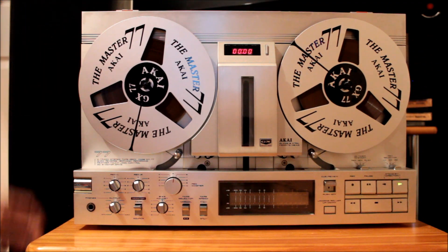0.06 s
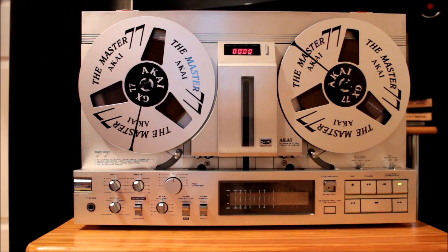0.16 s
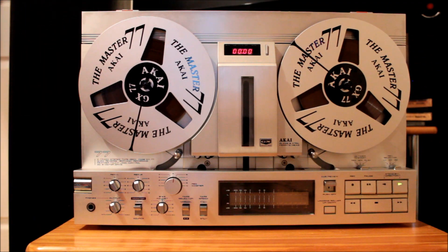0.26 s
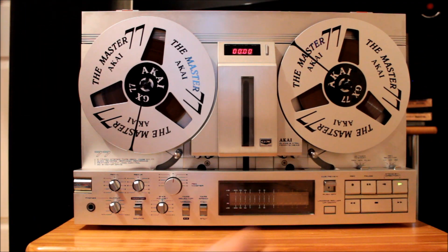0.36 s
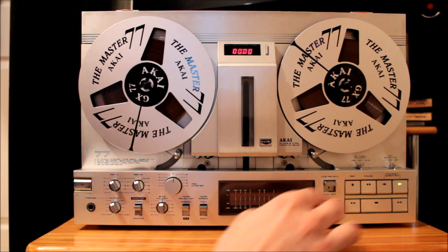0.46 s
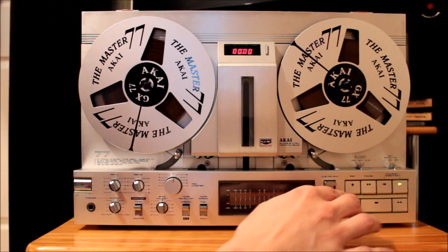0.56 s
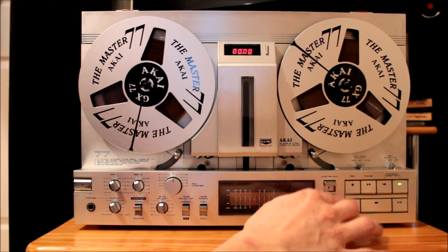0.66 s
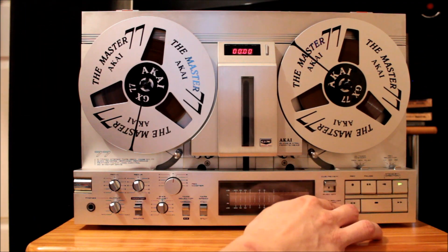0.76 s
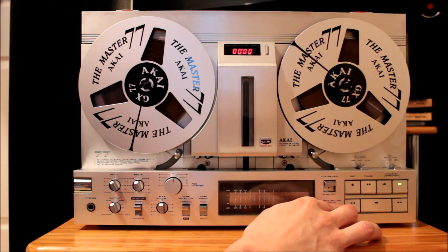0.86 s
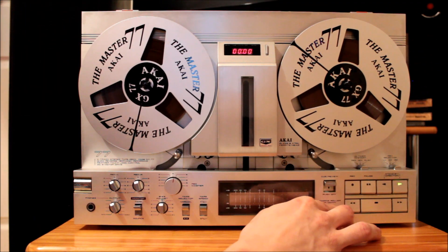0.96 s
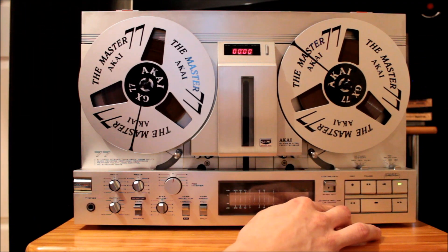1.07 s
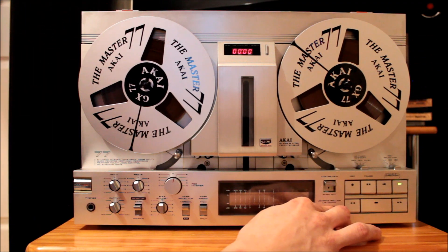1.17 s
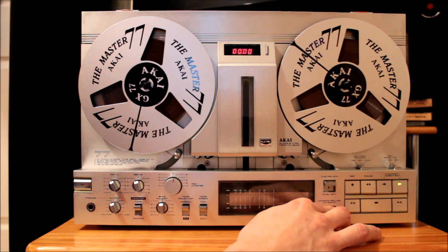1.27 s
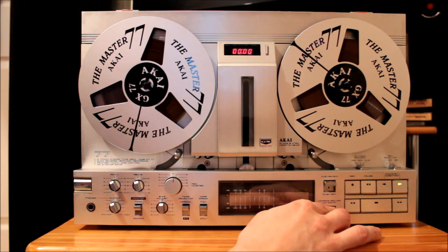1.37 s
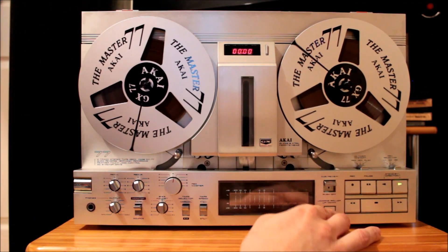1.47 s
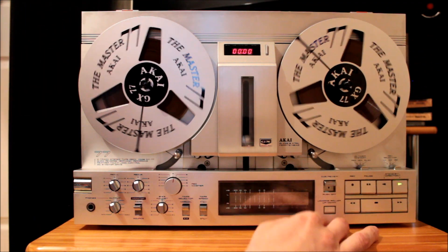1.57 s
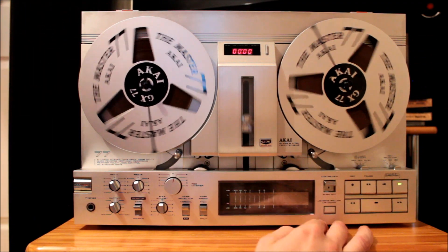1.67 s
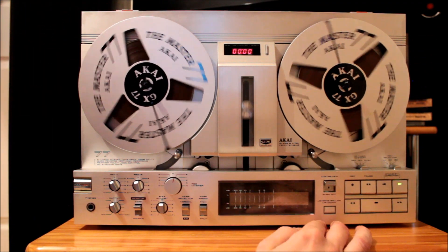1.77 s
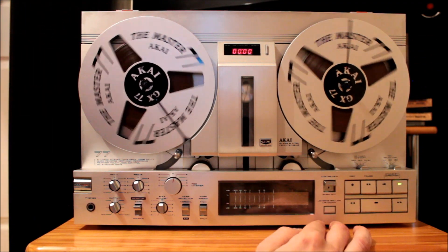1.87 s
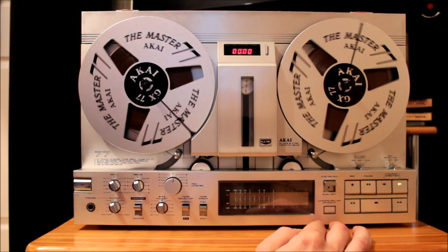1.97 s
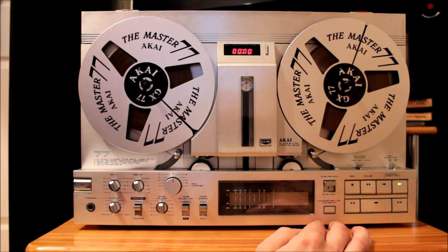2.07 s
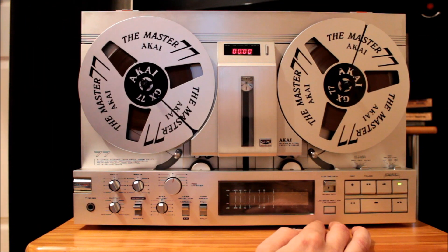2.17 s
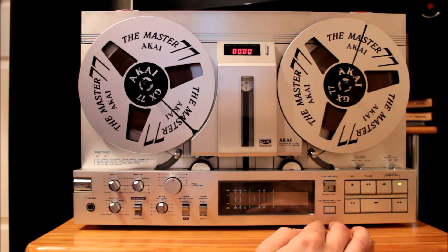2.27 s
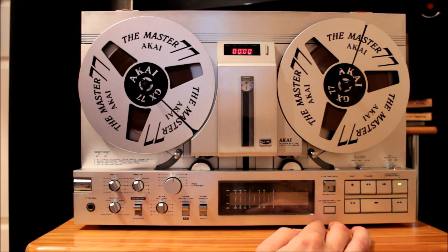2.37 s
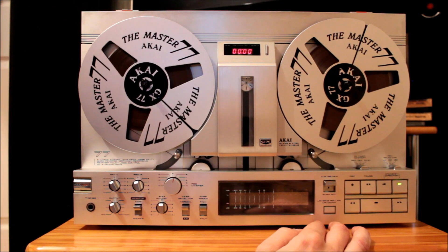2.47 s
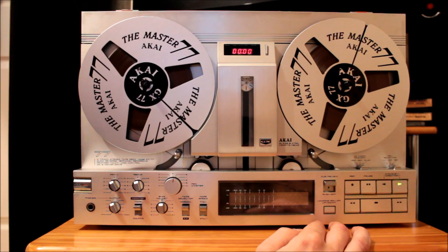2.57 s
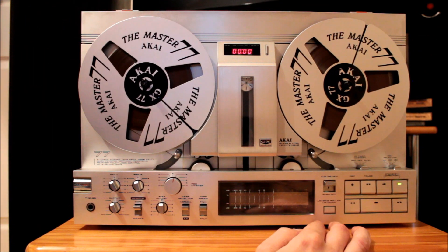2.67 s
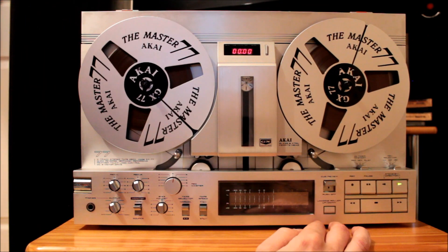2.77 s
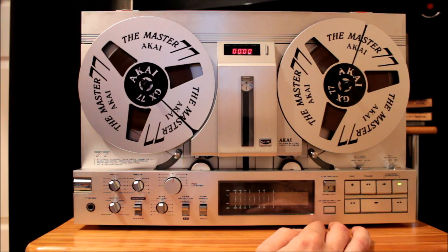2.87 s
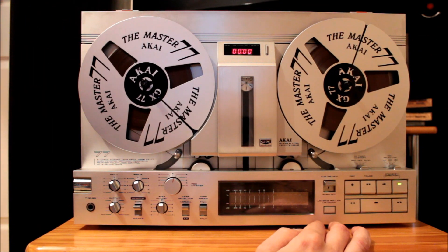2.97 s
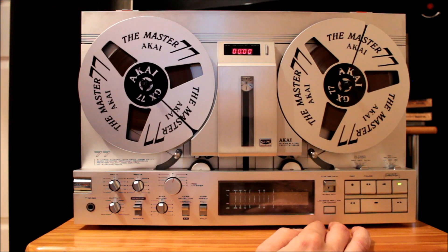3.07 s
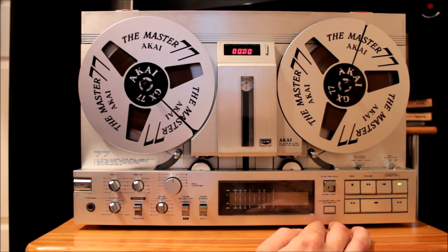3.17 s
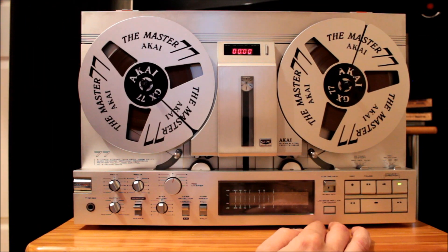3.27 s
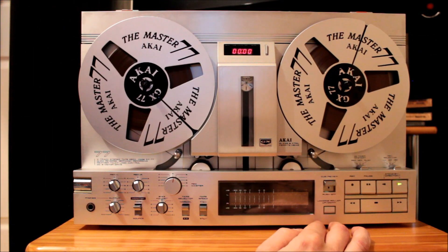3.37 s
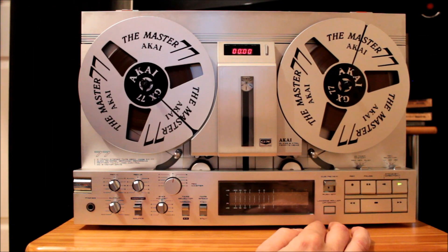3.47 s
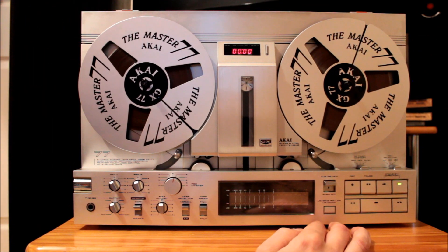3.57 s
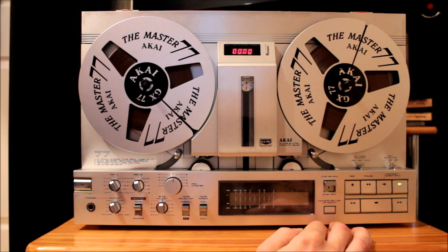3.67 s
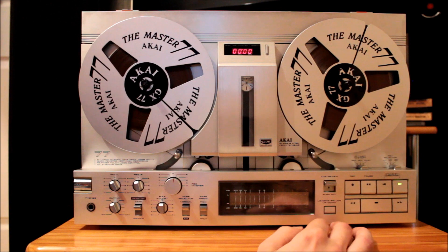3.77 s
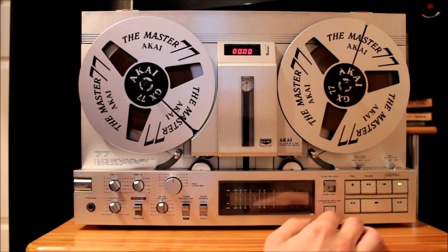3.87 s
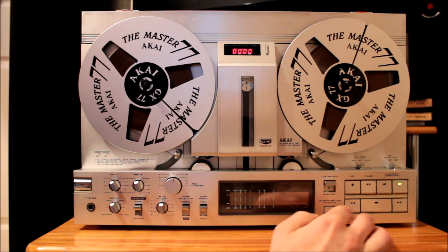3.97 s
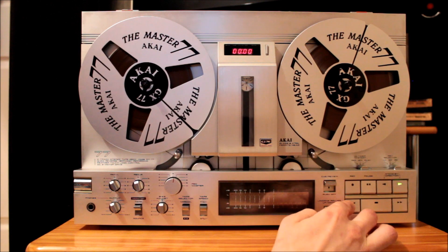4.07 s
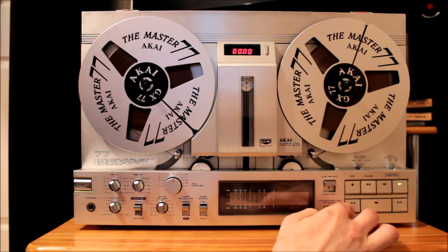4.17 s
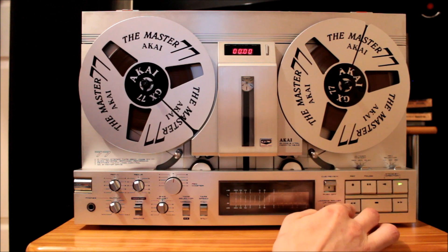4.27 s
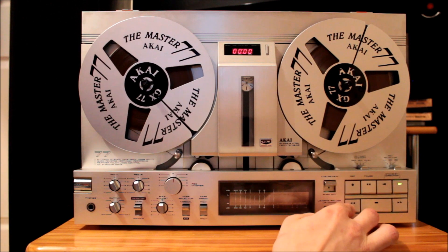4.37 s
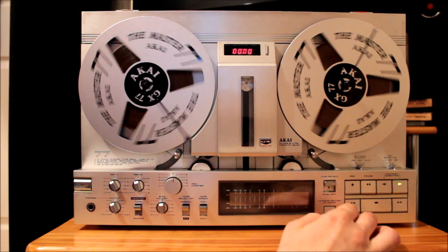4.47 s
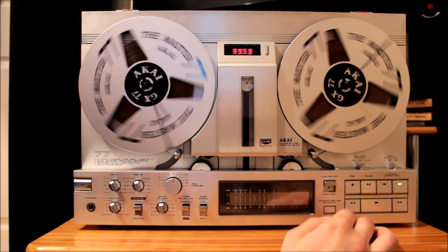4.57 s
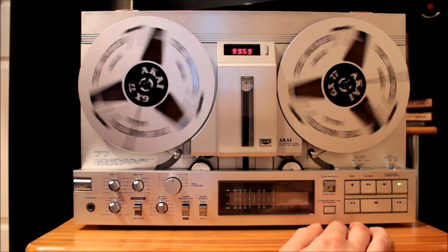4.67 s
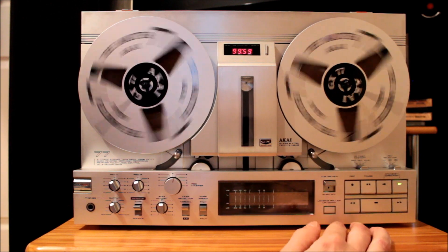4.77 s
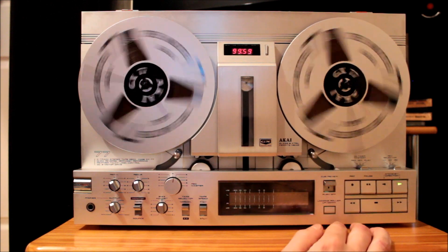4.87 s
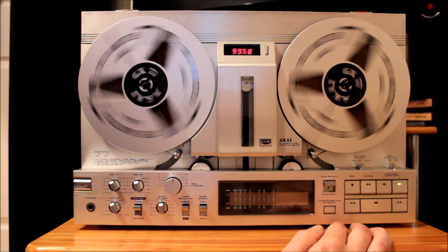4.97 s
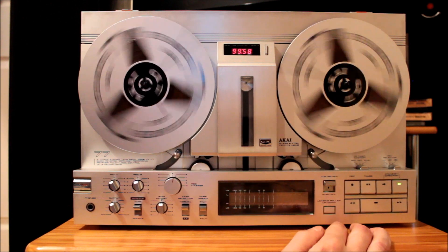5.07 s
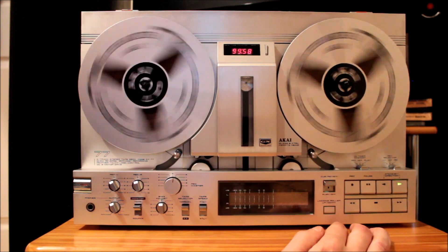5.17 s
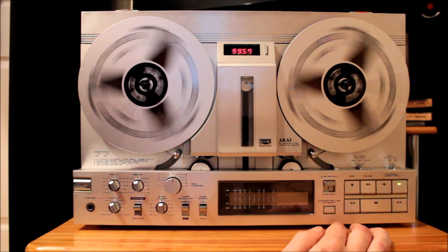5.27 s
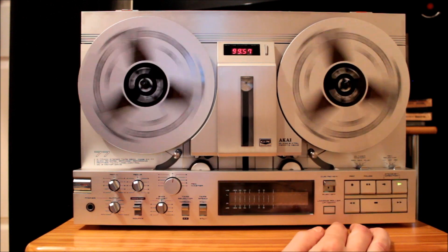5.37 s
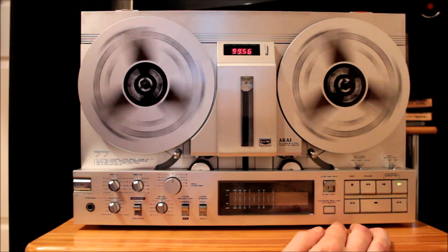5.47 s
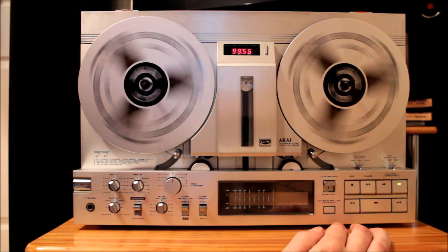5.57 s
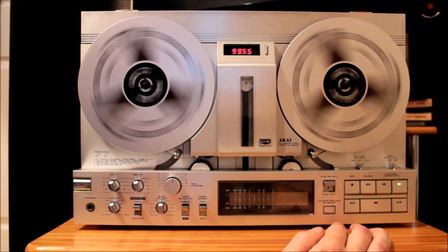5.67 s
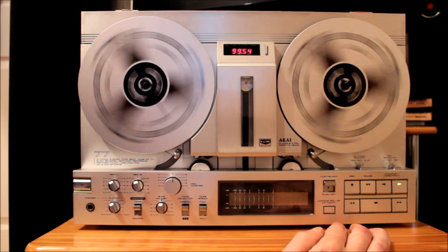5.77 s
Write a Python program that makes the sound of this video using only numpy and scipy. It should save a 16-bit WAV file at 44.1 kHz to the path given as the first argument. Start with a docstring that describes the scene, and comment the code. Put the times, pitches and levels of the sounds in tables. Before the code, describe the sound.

In a small quiet room, close to the microphone, cloth rustles softly. A reel-to-reel deck then clacks through a quick cluster of metallic clunks over a short rough motor hum, with smaller clicks as the motor stops. About two seconds of near silence follow. Light key clicks lead to one loud clunk, the case thumps, and the reels spin up with a motor whirr and swelling, singing tape hiss.

```python
"""Reel-to-reel tape deck in a quiet room: keys, levers and solenoids clunk as rattles of tiny impacts
that ring the deck's parts, the case rocks on its feet, and a small room echoes the clunks.
A sleeve (swelling cloth noise) rustles first; a lift motor (resonant noise plus harmonics) runs briefly.
Then the reels wind up to speed: tape hiss, singing guides and motor whirr, all noise growing with speed.
Steady air noise and low room tones lie beneath."""
import sys
import numpy as np
from scipy import signal
from scipy.fft import rfft, irfft
from scipy.io import wavfile

SR = 44100
rng = np.random.default_rng(int(sys.argv[2]) if len(sys.argv) > 2 else 0)


def invert_db(level):
    """Linear amplitude ratio for a level in decibels (20 dB per decade), elementwise."""
    return 10 ** (np.asarray(level, dtype=float) / 20)


def unload_audio(sound):
    """Save the sound as a 16-bit wav file, at the path given as the first command line argument."""
    columns = np.transpose(np.atleast_2d(sound))
    # keep every value between -1 and 1, then stretch to whole-number steps
    steps = np.round(np.clip(columns, -1, 1) * 32767)
    wavfile.write(sys.argv[1], SR, steps.astype(np.int16))


N = 256662


def rms_one(x):
    """Scale to unit rms."""
    return x / np.sqrt(np.mean(x ** 2) + 1e-20)


def coloured(points, size=N):
    """Unit-rms noise shaped by a relative spectrum in dB per Hz, interpolated over log frequency."""
    hz = np.maximum(np.arange(size // 2 + 1) * SR / size, 1)
    at_hz, db = np.transpose(points)
    shape = invert_db(np.interp(np.log(hz), np.log(at_hz), db, left=-80, right=-80))
    return rms_one(irfft(rfft(rng.standard_normal(size)) * shape, size))


def breathy(peaks):
    """Sum of noises through two-pole resonances; a 0 dB peak has unit rms."""
    out = 0
    for hz, width_hz, db in peaks:
        radius = np.exp(-np.pi * max(width_hz, 5) / SR)
        poles = [1, -2 * radius * np.cos(2 * np.pi * hz / SR), radius * radius]
        resonance = signal.lfilter([1, 0, -1], poles, rng.standard_normal(N))
        out = out + invert_db(db) * rms_one(resonance)
    return out


def drift(knots_per_s):
    """Slow random wander: unit-spread knots joined by straight lines."""
    knots = rng.standard_normal(400)
    return np.interp(np.arange(N) * knots_per_s / SR, np.arange(len(knots)), knots)


def ring(x, hz, t60_s):
    """Two-pole resonator: a unit click starts a decaying sine of height 1."""
    radius, w = invert_db(-60 / (t60_s * SR)), 2 * np.pi * hz / SR
    return signal.lfilter([0, np.sin(w)], [1, -2 * radius * np.cos(w), radius * radius], x + 1e-18)


def band(x, low_hz, high_hz, order=2):
    """Butterworth band-pass."""
    sos = signal.butter(order, [low_hz, min(high_hz, .45 * SR)], "band", fs=SR, output="sos")
    return signal.sosfilt(sos, x)


# air noise spectrum: (frequency [Hz], relative density [dB per Hz])
AIR_SPECTRUM = [(22, -20), (55, -18), (85, -10.5), (135, -6.5), (155, -12.5), (190, -1), (235, -1.5),
                (366, -7.5), (988, -11), (1300, -16.5), (2450, -23.5), (8030, -28.5), (13200, -23.5),
                (16000, -28)]
# low room tones: (frequency [Hz], width [Hz], level [dB])
ROOM_TONES = [(92.9, 1.7, -63.5), (135.4, 15, -66.5), (214, 14, -66)]
AIR_LEVEL_DB = -49.5


def room_air():
    """Steady broadband air noise plus narrow low resonances of the room."""
    return invert_db(AIR_LEVEL_DB) * coloured(AIR_SPECTRUM) + breathy(ROOM_TONES)


# sleeve strokes: (start [s], length [s], peak level [dB])
SLEEVE_STROKES = [(0.027, 0.18, -59.5), (.12, 0.28, -52), (0.37, 0.18, -56.5), (0.505, 0.19, -55.5),
                  (.8, .15, -63), (1.094, .03, -58), (1.12, 0.033, -57)]
# cloth friction spectrum: (frequency [Hz], relative density [dB per Hz])
CLOTH_SPECTRUM = [(900, -1), (2000, -2), (5000, -4), (9000, -9.5), (16000, -8.5)]


def sleeve():
    """Cloth brushes on cloth as the arm reaches over: noise swelling and fading in half-sine strokes."""
    t = np.arange(N) / SR
    level = 0
    for start_s, length_s, db in SLEEVE_STROKES:
        level = level + invert_db(db) * np.sin(np.pi * np.clip((t - start_s) / length_s, 0, 1))
    flutter = invert_db(0.89 * drift(58.6))
    return level * flutter * coloured(CLOTH_SPECTRUM)


# keys, levers, solenoids: (time [s], nominal knock level [dB], nominal crack level re knock [dB],
#   struck-part pitch [Hz], rattle decay [ms])
CONTACT_EVENTS = [(1.246, -21.5, -10.5, 2000, 3.2), (1.266, -13.5, -3, 2400, 5.4),
                  (1.270, -14.5, -3, 3300, 3.96), (1.275, -5, -5, 1510, 2.48), (1.290, -31, -7, 4640, 14),
                  (1.322, -10, -26, 1460, 2.36), (1.325, -15, -14, 2320, 7.3),
                  (1.357, -17, -1.5, 2030, 3.5), (1.440, -29.5, -32, 1150, 6), (1.481, -24, -4, 1910, 2.7),
                  (1.484, -8, 1, 2380, 4.05), (1.491, -13, -2.5, 2560, 5.05),
                  (1.563, -17.5, -31, 1500, 2.7), (1.565, -16, -15, 2650, 4.1),
                  (1.589, -17, 2.1, 2420, 9.7), (1.596, -18, 7, 4020, 2.9), (1.604, -13, 0.5, 2400, 6.7),
                  (1.678, -30, -30, 2710, 7.66), (2.027, -19.5, -28, 2120, 3.6),
                  (2.029, -20, -35, 1300, 3.7), (2.031, -33.5, -35, 680, 4.7), (2.093, -16.5, 1, 2320, 4.6),
                  (2.108, -22, -1.5, 1920, 13), (2.128, -22, -7, 4540, 2.4), (2.130, -16, -2.5, 1670, 5.6),
                  (2.138, -25.5, -17, 528, 11.8), (2.248, -33, -21, 13100, 1.9),
                  (4.283, -38.5, -25, 2400, 3.5), (4.354, -32.5, -14, 1600, 6.6),
                  (4.38, -39, -12, 3330, 2.5), (4.389, -28.5, -1, 2480, 9.5), (4.393, -26, -36, 7550, 5.5),
                  (4.42, -38, 4, 2300, 2.2), (4.483, -26, -18, 1170, 2.9), (4.488, -14.5, -4, 1340, 6.47),
                  (4.493, -9.5, 0.2, 1860, 3.97), (4.4978, 0.5, -5.5, 3490, 2.11),
                  (4.498, -8.5, -14, 1220, 3.44), (4.504, -32, -3, 3300, 8)]
# ringing levers, panels, reels: (centre frequency [Hz], relative level [dB], t60 [s])
DECK_PARTS = [(403.4, -10, 0.21), (427, -13.5, 0.55), (678, -1, 0.039), (1078, -11.5, 0.079),
              (1210, -7.5, 0.17), (1284, -11.5, 0.062), (1780, -3, 0.032), (2550, -9, 0.064),
              (2534, -14.5, 0.18), (2794, -37, 0.12), (3300, -10, 0.092), (3440, -7, 0.022),
              (3755, -2.5, 0.047), (4460, -18.5, 0.15), (5100, 4, 0.087), (5545, 8.5, 0.031),
              (7550, -44, 0.087), (8700, -17, .05), (10040, -6.5, 0.1), (10000, 2, 0.082),
              (12900, -26, 0.021)]
RING_DB = -42.0
SMALL_HZ = 2500   # parts pitched above this knock in a narrower band
THUD_DB, THUD_DB_PER_DOUBLING = -13.5, 3   # panel thud re knock at a 4 ms rattle; longer = heavier part
THUD_DB_PER_OCTAVE = -13   # above SMALL_HZ: small parts hardly shake the panel
PING_DB = 12   # most that a softly touched small part gains in narrow ping; its broad knock loses half


def contacts():
    """Each contact is a short rattle of tiny impacts, heard directly and through the parts it rings."""
    out, t = np.zeros(N), np.arange(SR // 4) / SR
    click = 1.0 * (t == 0)
    for time_s, knock_db, crack_db, part_hz, rattle_ms in CONTACT_EVENTS:
        strength = invert_db(2.63 * np.minimum(rng.exponential(1, len(t)), 4))
        impacts = rng.standard_normal(len(t)) * strength
        length_s = max(rattle_ms, .5) / 1000
        swell = (1 - np.exp(-t / (0.46 * length_s))) * np.exp(-t / length_s)
        size = invert_db(knock_db) * np.sqrt(np.mean(swell ** 2))

        small = part_hz > SMALL_HZ
        length_doublings = np.log2(length_s / .004)
        octaves_small = max(np.log2(part_hz / SMALL_HZ), 0)
        ping_db = PING_DB * np.clip(-crack_db / 25, 0, 1) * small
        thud_db = THUD_DB + THUD_DB_PER_DOUBLING * length_doublings + THUD_DB_PER_OCTAVE * octaves_small
        layers = [  # (level re size [dB], low [Hz], high [Hz])
            (-1.0 - ping_db / 2, part_hz / (1.22 if small else 2.12), part_hz * 1.33),   # knock
            (-17.0 + ping_db, part_hz / 1.083, part_hz * 1.09),   # ping
            (thud_db, 350.0, 800.0),
            (crack_db - 2.0, 3800.0, 8000.0),
            (crack_db - 1.0, 8000.0, 16000.0)]
        rattle = blow = 0
        for db, low_hz, high_hz in layers:
            gain = invert_db(db) * size
            rattle = rattle + gain * rms_one(swell * band(impacts, low_hz, high_hz, order=3))
            blow = blow + gain * rms_one(band(click, low_hz, high_hz, order=3))

        detunings = 1 + .035 * rng.normal(0, 1, (len(DECK_PARTS), 8))   # 8 close modes per part
        rings = 0
        for (hz, db, t60_s), cluster in zip(DECK_PARTS, detunings):
            near_db = -24 * min(abs(np.log2(hz / part_hz)), .45)   # parts near the struck pitch ring most
            modes = sum(ring(blow, hz * detune, t60_s) for detune in cluster)
            rings = rings + invert_db(db + near_db) * modes
        rings = np.roll(rings, round(length_s * SR / 2))   # parts answer once the rattle has swollen
        at = round(time_s * SR)
        out[at:at + len(t)] += (rattle + invert_db(RING_DB) * rings)[:N - at]
    return out


# echo decay: (frequency [Hz], t60 [s])
ROOM_DECAY = [(200, 0.61), (800, 0.24), (3000, 0.3), (8000, 0.25), (15000, 0.21)]
ROOM_DB = -5.5


def room(x):
    """Echo of a small furnished room: noise dying away band by band, of unit energy before ROOM_DB."""
    t, echo = np.arange(SR // 2) / SR, 0
    edges_hz = np.geomspace(100, 18000, 9)
    hz, t60_s = np.transpose(ROOM_DECAY)
    for low_hz, high_hz in zip(edges_hz, edges_hz[1:]):
        decay_s = np.interp(np.log(low_hz * high_hz) / 2, np.log(hz), t60_s)
        echo = echo + band(rng.standard_normal(len(t)), low_hz, high_hz) * invert_db(-60 * t / decay_s)
    echo *= 1 - np.exp(-(t / 0.0043) ** 2)   # first walls answer after a few ms
    echo = echo / np.sqrt(np.sum(echo ** 2))
    return invert_db(ROOM_DB) * signal.fftconvolve(x, echo)[:N]


# rough motor noise: (frequency [Hz], relative density [dB per Hz])
LIFT_SPECTRUM = [(200, -15), (300, 2), (400, -11), (700, 7), (1200, -15), (2200, -13), (3200, -35),
                 (5000, -22)]
# housing resonances: (frequency [Hz], width [Hz], relative level [dB])
LIFT_RESONANCES = [(381, 120, 6.5), (632, 38, 11), (1150, 470, 12.5)]
# commutator harmonics 1 to 6: nominal peak re rough noise rms [dB]
LIFT_HARMONICS_DB = [-16, -9, -20, -5, -9, -15]
LIFT_FULL_FROM_S, LIFT_FULL_TO_S, LIFT_RAMP_S = 1.32, 2.2, .04   # ramps lie outside the full-level span
LIFT_DB, LIFT_FLUTTER_DB = -42.5, 1.5
LIFT_HZ, LIFT_WAVER = 190.6, .006   # commutator pitch; waver as share of pitch


def lift_motor():
    """Geared motor: rough noise with singing housing resonances, plus wavering commutator hum."""
    t = np.arange(N) / SR
    inside_s = np.minimum(t - LIFT_FULL_FROM_S, LIFT_FULL_TO_S - t)
    level = invert_db(LIFT_DB) * np.clip(inside_s / LIFT_RAMP_S + 1, 0, 1)
    phase = 2 * np.pi * np.cumsum(LIFT_HZ * (1 + LIFT_WAVER * drift(8.38))) / SR
    hum = 0
    for order, db in enumerate(LIFT_HARMONICS_DB, 1):
        hum = hum + invert_db(db + 4.6 * drift(24.77)) * np.sin(order * phase)
    rough = rms_one(coloured(LIFT_SPECTRUM) + invert_db(-10.5) * breathy(LIFT_RESONANCES))
    return level * invert_db(LIFT_FLUTTER_DB * drift(30.03)) * (rough + hum)


# chassis pushes: (time [s], nominal level [dB], frequency [Hz])
CHASSIS_ROCKS = [(1.287, -39, 247), (1.329, -28, 232), (2.053, -35, 186), (2.149, -35, 202),
                 (4.51, -31.5, 270), (4.539, -32, 254), (4.576, -28, 235), (4.614, -43, 219)]
FEET_T60_S = 0.086


def rocking():
    """Soft low pushes ring the heavy case on its feet."""
    out = 0
    for time_s, db, hz in CHASSIS_ROCKS:
        push = np.zeros(N)
        push[round(time_s * SR)] = invert_db(db)
        out = out + band(ring(push, hz, FEET_T60_S), hz / 1.3, hz * 1.3)   # swells over some cycles
    return out


# tape hiss spectrum: (frequency [Hz], relative density [dB per Hz])
TAPE_SPECTRUM = [(760, -50), (1300, -25), (1740, -6), (1900, -21), (2150, -3.5), (3040, -9), (4260, -3.5),
                 (4830, -8.5), (7130, -9.5), (11400, -10), (12600, -7), (15200, -10), (16000, -15)]
# tape guide resonances: (frequency [Hz], width [Hz], relative level [dB])
GUIDE_RESONANCES = [(2100, 80, -8.5), (2400, 100, -9), (3380, 62, -7.5), (4110, 120, 0), (4340, 160, 2.5),
                    (5130, 140, -3), (6230, 370, -12), (12300, 450, -12)]
# reel motor housing: (frequency [Hz], width [Hz], relative level [dB])
REEL_RESONANCES = [(450, 190, 0), (732, 49, -5), (740, 67, -1.5), (872, 27.5, 1), (1091, 25, -0.5),
                   (1050, 1200, 0.5)]
WIND_ON_S, SPIN_UP_S = 4.52, 1   # start; time constant towards full speed
HISS_DB, HISS_POWER = -48, 0.69   # full-speed level; amplitude grows as speed to this power
SING_POWER = 0.54   # guide amplitude re hiss grows as speed to this power
WHIRR_DB, WHIRR_POWER = -46, 1
SURGE_DB, SURGE_S = -39.5, 0.11   # a brief burst of whirr at the start; decay time constant


def winding():
    """Tape hisses over singing guides and the reel motor whirrs after a start surge; both follow speed."""
    since_s = np.maximum(np.arange(N) / SR - WIND_ON_S, 0)
    speed = 1 - np.exp(-since_s / SPIN_UP_S)
    hiss_level = invert_db(HISS_DB) * speed ** HISS_POWER
    whirr_level = invert_db(WHIRR_DB) * speed ** WHIRR_POWER
    surge_level = invert_db(SURGE_DB) * np.exp(-since_s / SURGE_S) * (since_s > 0)
    singing = speed ** SING_POWER * invert_db(-6.5 + 0.9 * drift(6.1)) * breathy(GUIDE_RESONANCES)
    tape = invert_db(1.0 * drift(22.0)) * hiss_level * (coloured(TAPE_SPECTRUM) + singing)
    motor = (whirr_level + surge_level) * rms_one(breathy(REEL_RESONANCES))
    return tape + motor


def scene():
    """Sleeve, deck, echo of the clunks and steady room air, in mono."""
    clunks = contacts() + rocking()
    deck = clunks + room(clunks) + lift_motor() + winding()
    return (deck + sleeve() + room_air())[None]


def roll_off(x):
    """The treble ends steeply here."""
    return signal.sosfilt(signal.butter(12, 16380, fs=SR, output="sos"), x)


def record(dry):
    """Low-pass with a 50 dB stopband from 16.6 kHz, then clip at full scale."""
    low_pass = signal.cheby2(10, 50, 16600, fs=SR, output="sos")
    mix = np.clip(signal.sosfilt(low_pass, dry), -1, 1)
    return roll_off(mix)


dry = scene()
out = record(dry)
unload_audio(out)
```